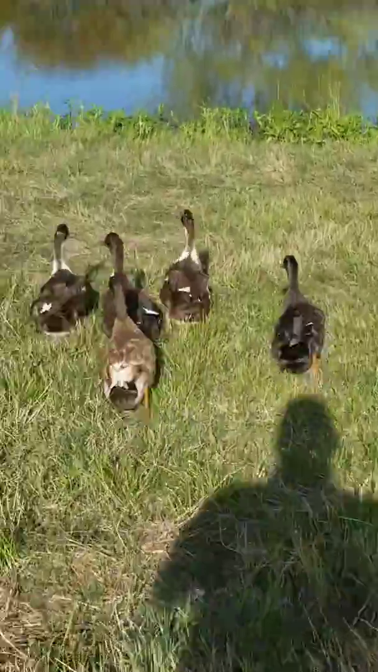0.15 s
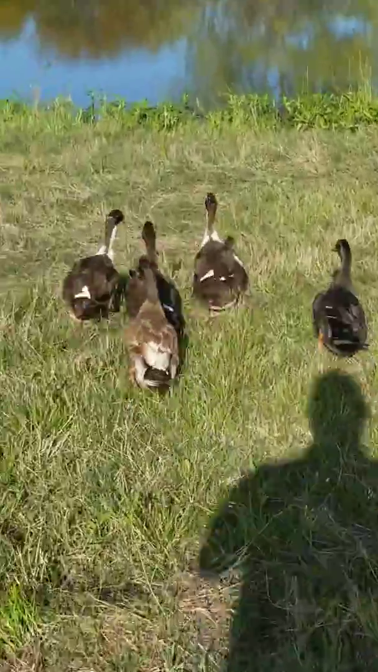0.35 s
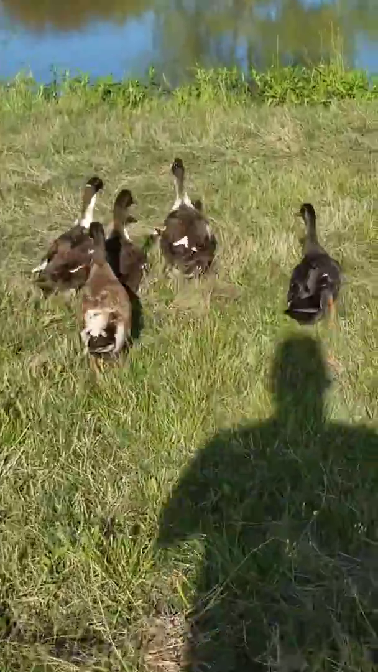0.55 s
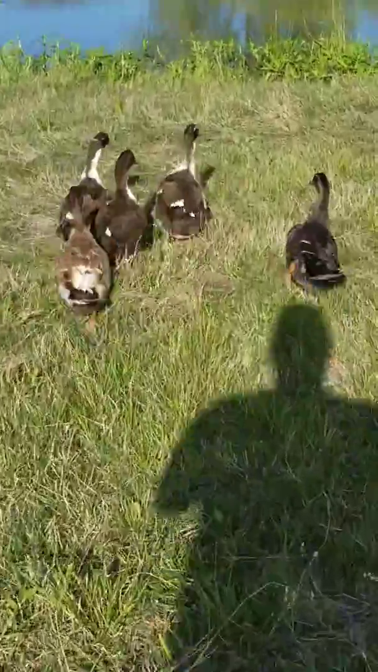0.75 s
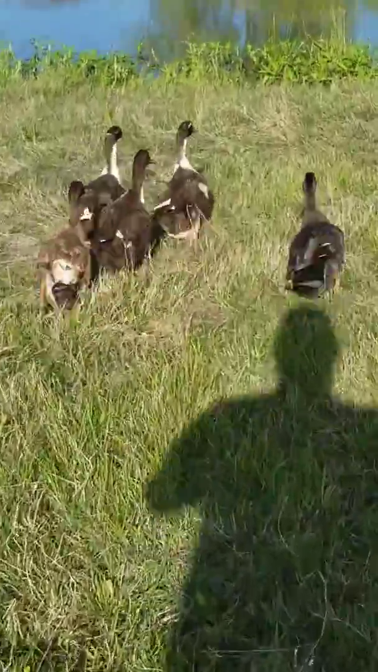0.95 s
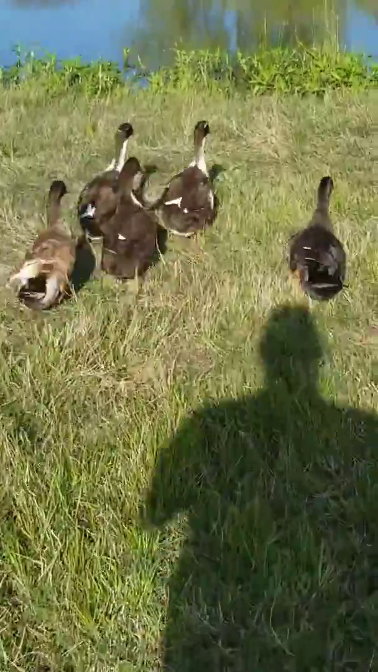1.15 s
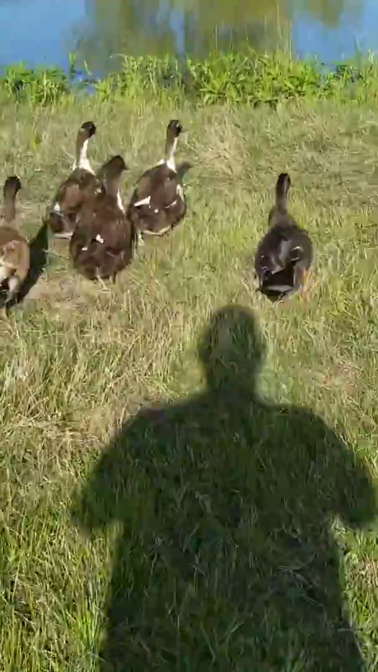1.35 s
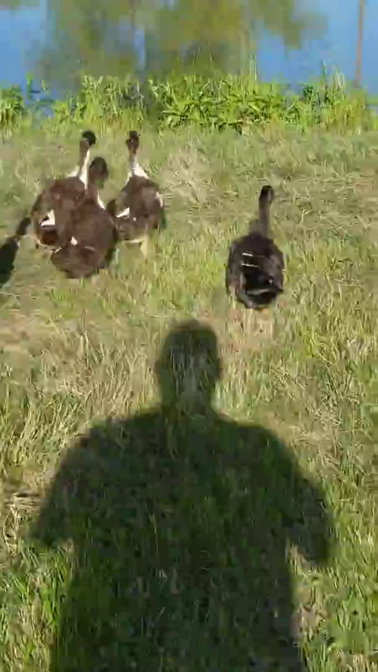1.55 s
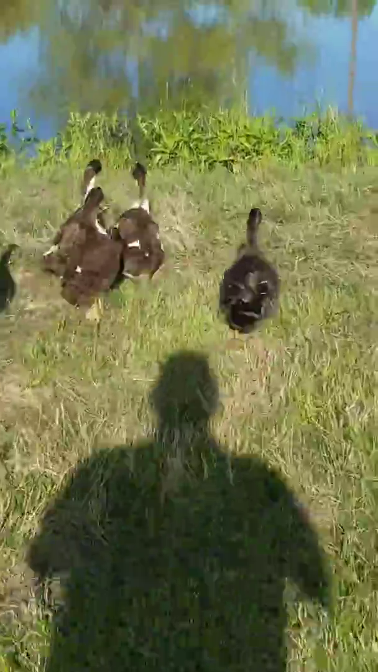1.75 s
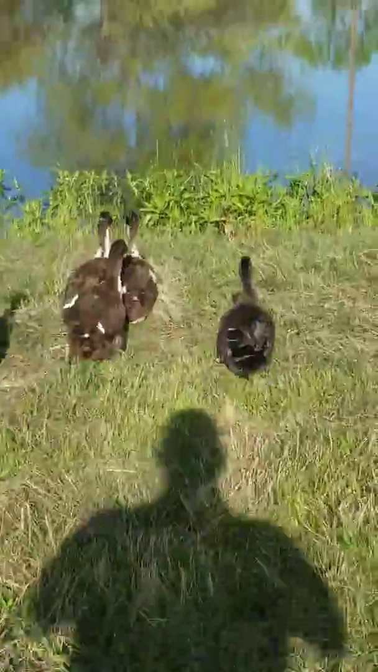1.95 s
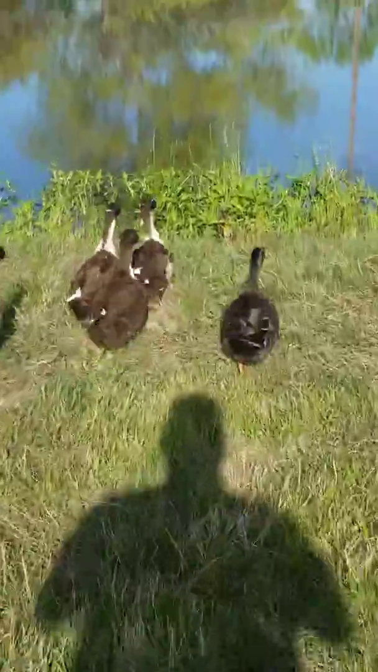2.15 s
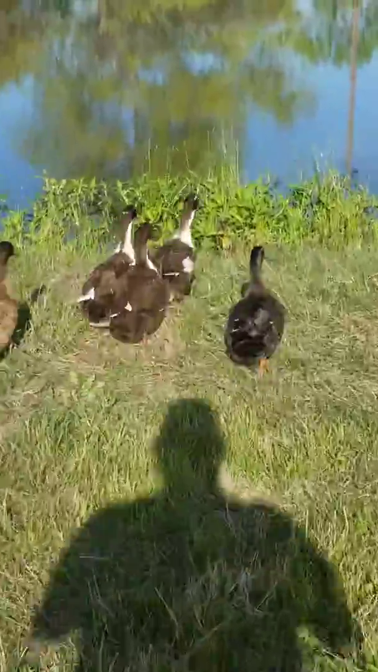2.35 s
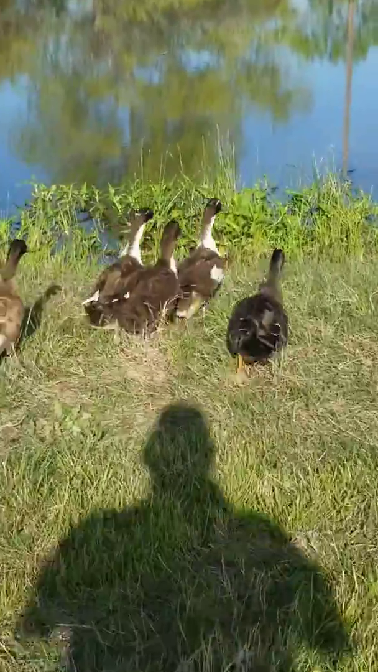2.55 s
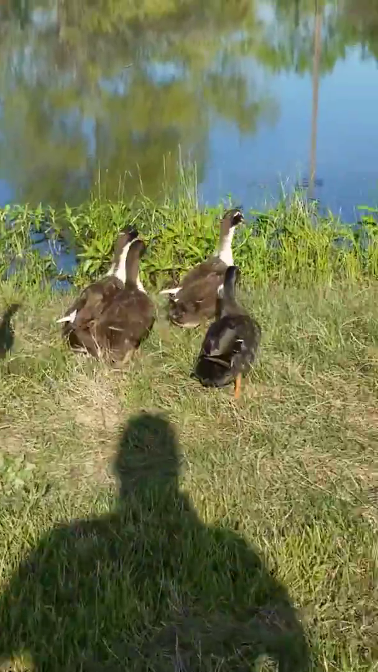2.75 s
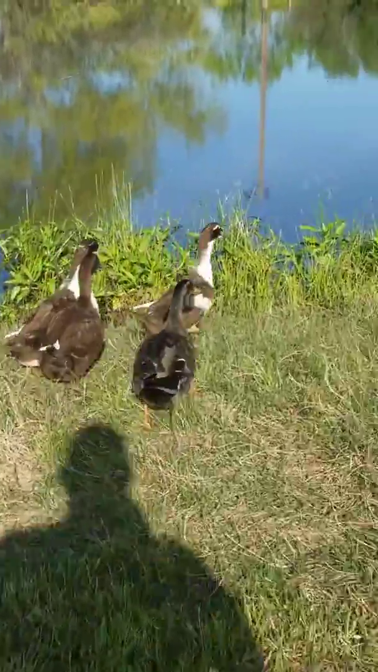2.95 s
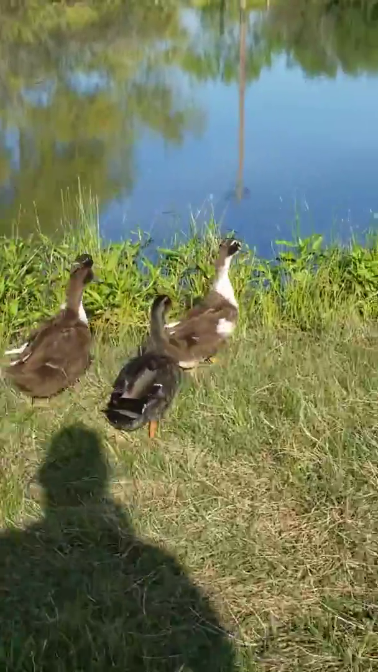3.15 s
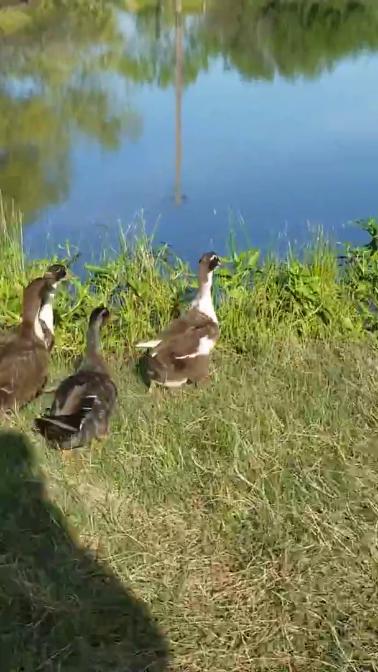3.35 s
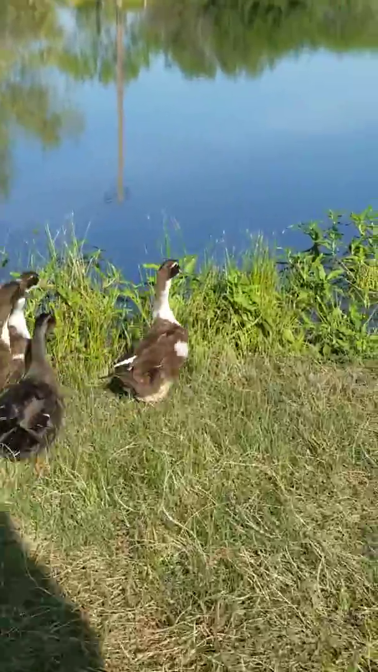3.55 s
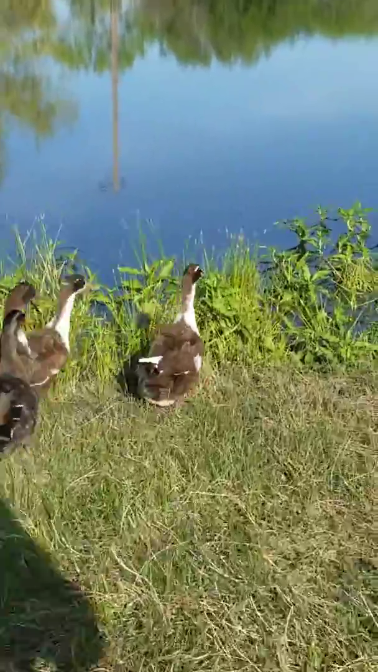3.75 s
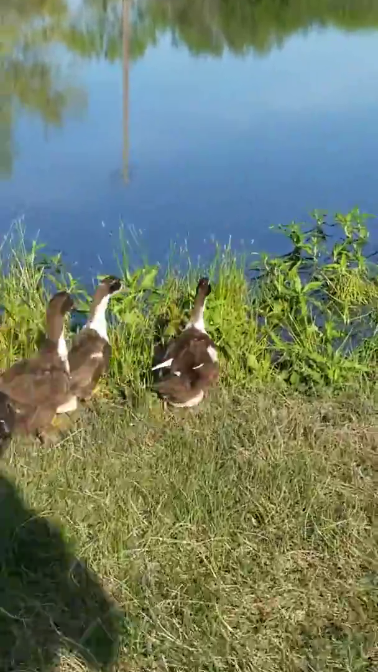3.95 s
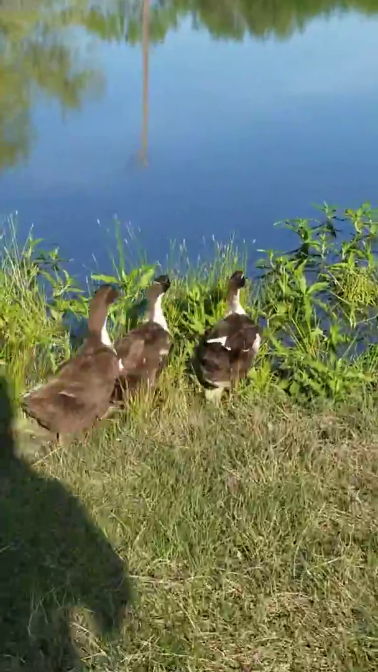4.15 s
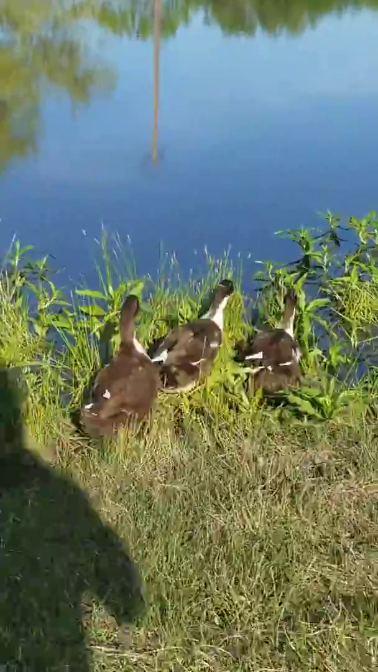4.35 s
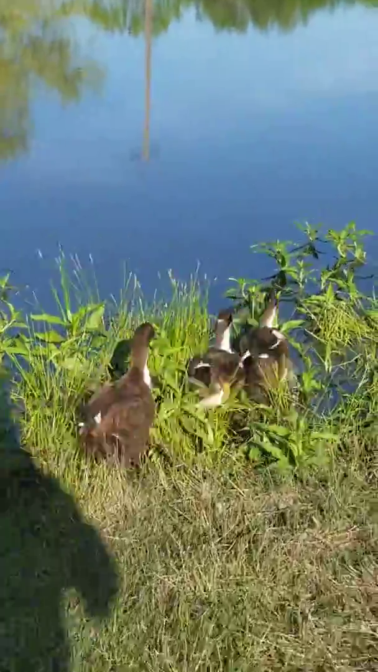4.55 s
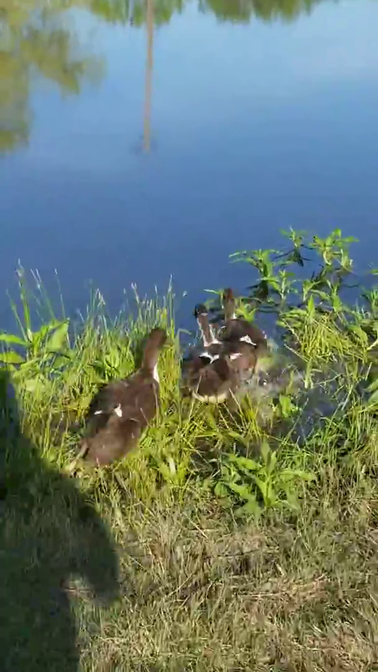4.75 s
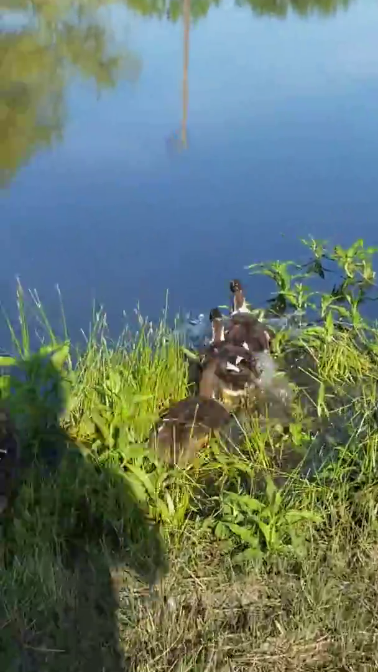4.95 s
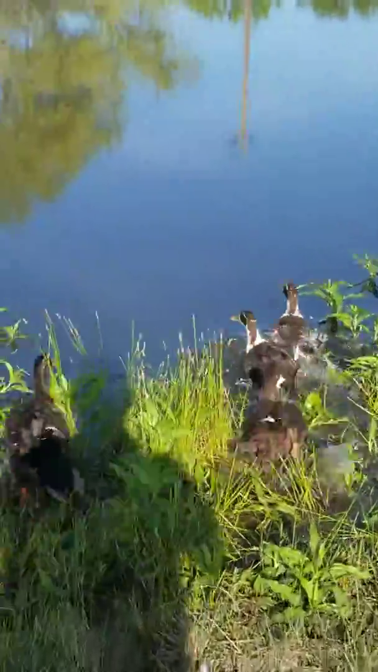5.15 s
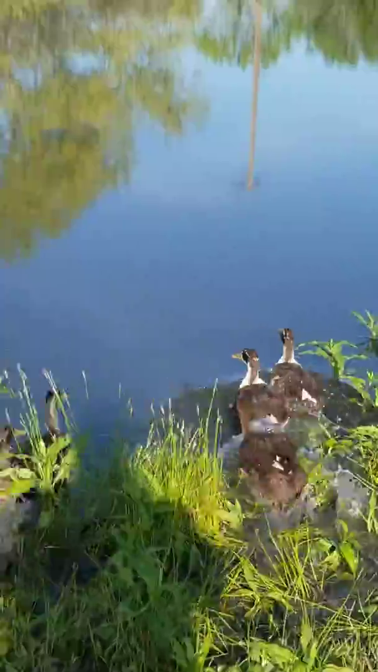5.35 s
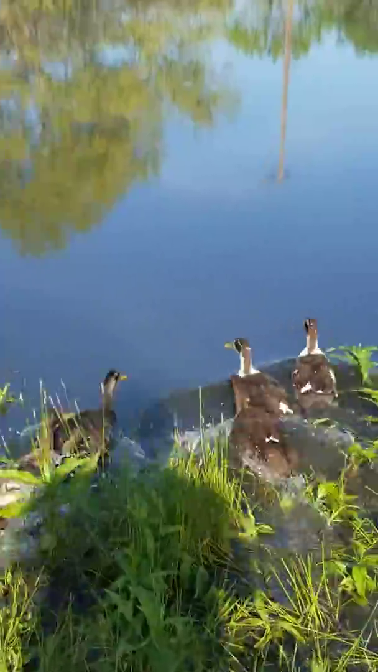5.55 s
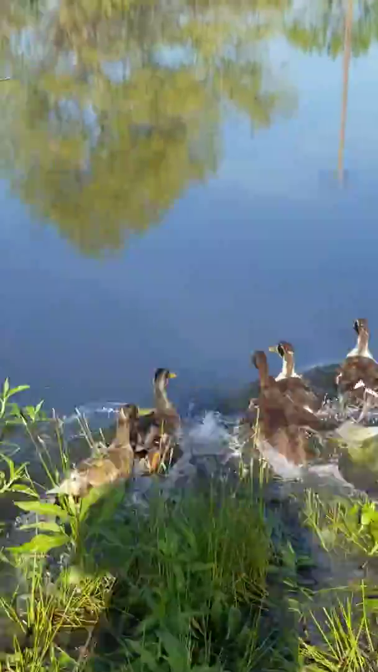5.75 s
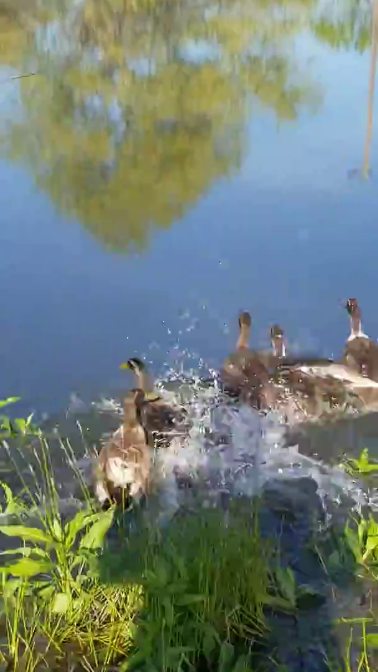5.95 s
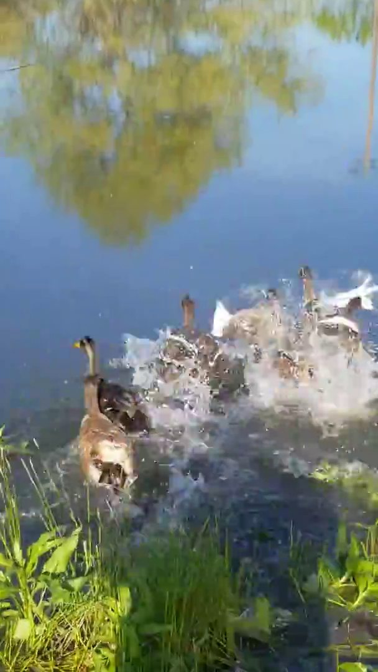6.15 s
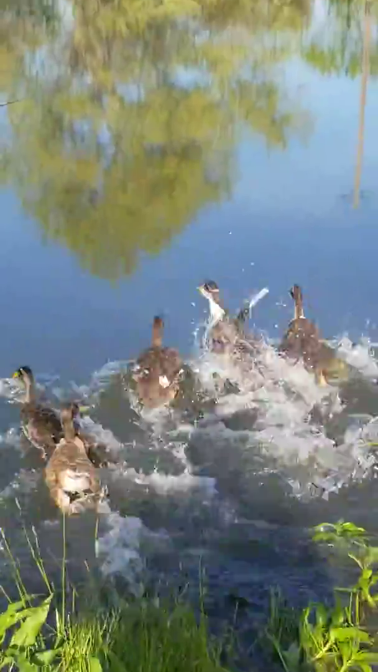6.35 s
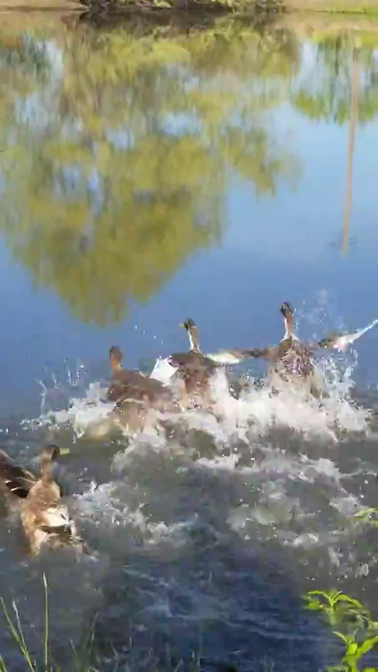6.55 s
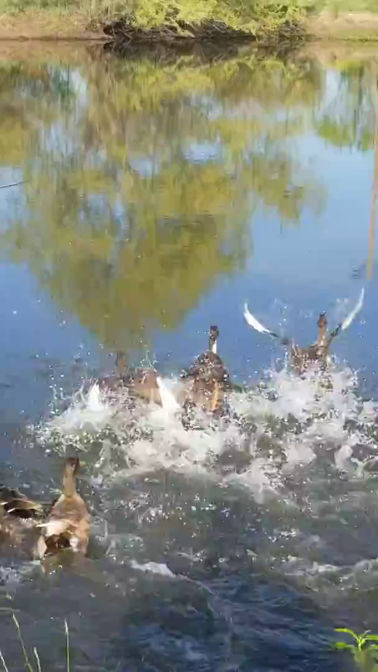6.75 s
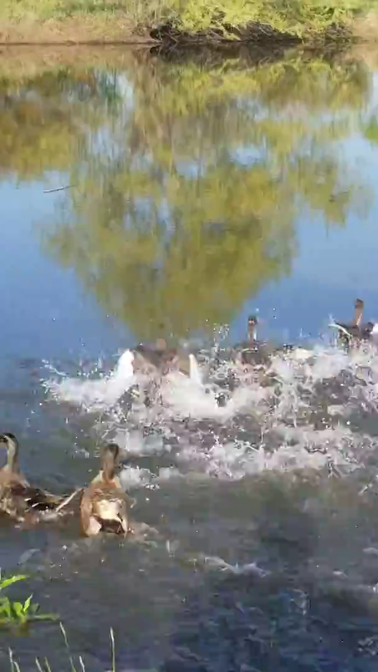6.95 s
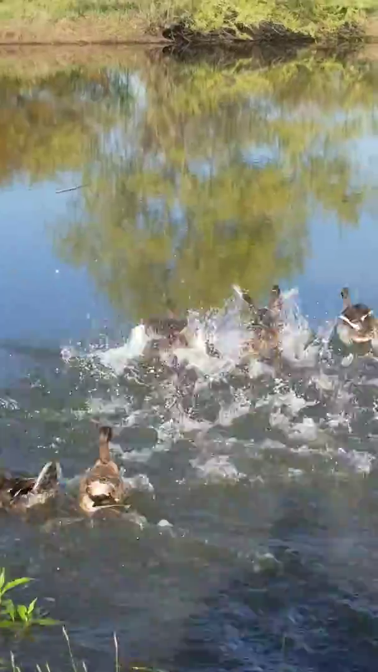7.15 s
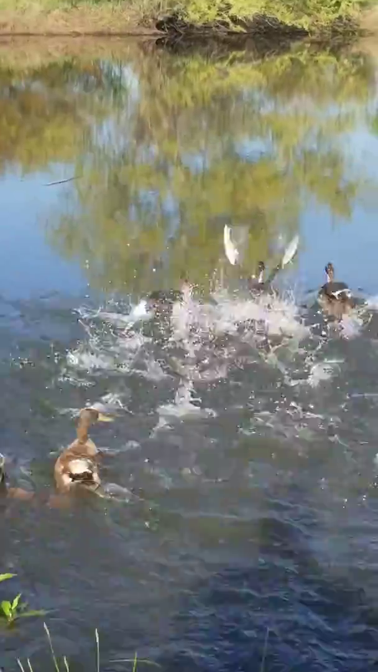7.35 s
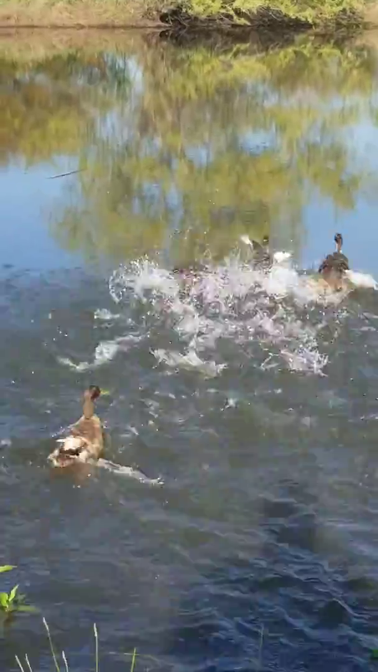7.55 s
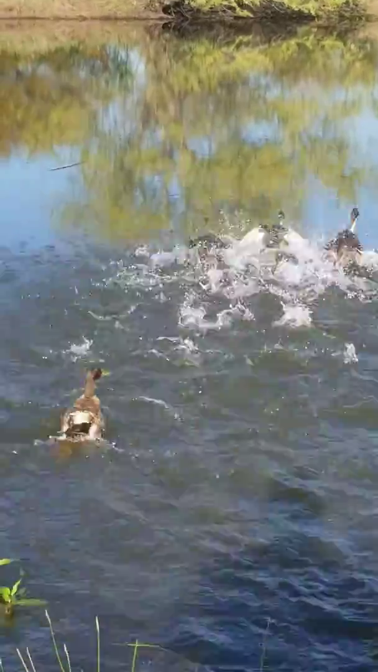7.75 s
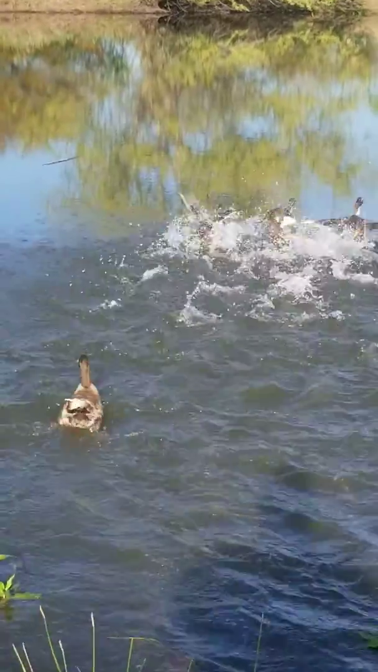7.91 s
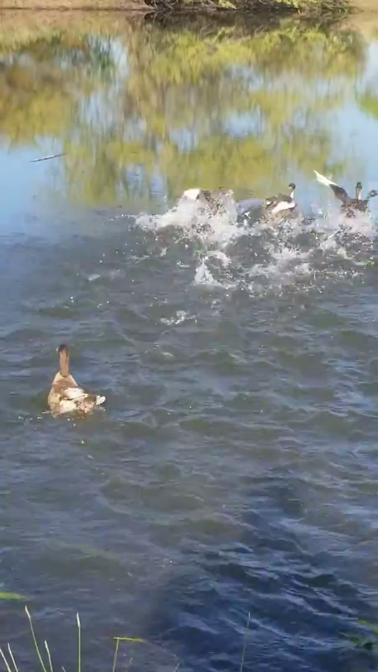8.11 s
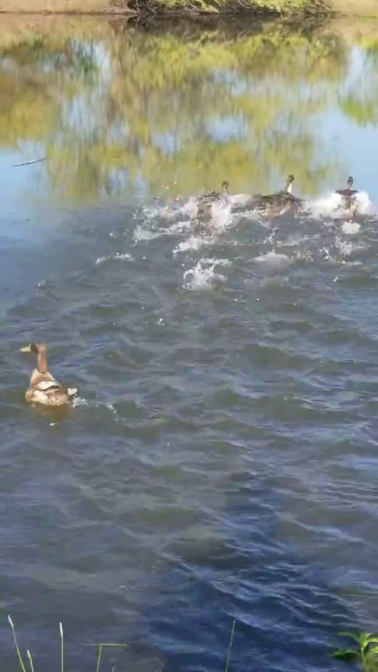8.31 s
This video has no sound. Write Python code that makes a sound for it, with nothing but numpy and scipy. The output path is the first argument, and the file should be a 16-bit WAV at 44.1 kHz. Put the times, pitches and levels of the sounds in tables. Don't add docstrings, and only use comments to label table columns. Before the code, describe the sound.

Outdoors in the open, a walker's boots crunch dry grass close below the microphone while ducks scuffle ahead, stalks ticking and snapping, with sparse quiet rasping quacks. At the bank the birds cluck quickly and weeds crack. They plunge into the pond; slaps, plops and spray build to a loud flurry, then recede as they swim away. A handheld phone catches faint low breeze buffeting.

```python
import sys
import numpy as np
from scipy import signal
from scipy.fft import rfft, irfft, next_fast_len
from scipy.io import wavfile
from scipy.ndimage import map_coordinates

SR = 44100
rng = np.random.default_rng(int(sys.argv[2]) if len(sys.argv) > 2 else 0)


def volts_from_decibels(level):
    exponent = np.asarray(level, float) / 20
    return 10 ** exponent


def generate_wav(signal):
    frames = np.transpose(np.atleast_2d(signal))
    scaled = np.clip(frames, -1, 1) * 32767
    pcm = np.round(scaled).astype(np.int16)
    wavfile.write(sys.argv[1], SR, pcm)


N = 369548

# f/Hz, level/dB, left minus right/dB
BELOW_COLOUR = [(125, -36, 47), (283, -7.5, -14), (425, 5.5, -3), (700, 1.5, 3), (1074, 2, -11),
                (1400, 7, 7.5), (1600, 11, -6), (1900, 1, 0.5), (2900, -4, 0), (5160, -10, 0),
                (5560, -15, -5.5), (9070, -16, -3), (12800, -5, -2), (16600, -9.5, -5.5)]
# f/Hz, level/dB, left minus right/dB
AHEAD_COLOUR = [(78.4, -14.5, 6), (209, -13, 0.5), (350, -12, 3.5), (560, 1.5, 3), (794, -4, 2),
                (1400, -3, -0.5), (1850, -0.5, -6), (2930, -4.5, -1), (2985, -8, 9), (4180, -5, -5.5),
                (5060, -9, -3), (7770, -17.5, 7.5), (9200, -29, -4), (11700, -23, 2)]
# f/Hz, phase/rad
BELOW_LEAD = [(0, 0.5), (800, -2.5), (1600, -5.0), (2900, -9), (16000, -53.5)]
# f/Hz, phase/rad
AHEAD_LEAD = [(0, 0), (600, -.25), (1450, -.6), (1800, .15), (2300, 1.8), (3000, 2.9), (3500, 3.3),
              (4000, 4.9), (5600, 7.2), (16000, 19.4)]
# f/Hz, boots/1, pond/1
LIKENESS = [(300, .5, .95), (700, .87, .96), (1600, .83, .86), (3000, .93, .72), (5500, .8, .65),
            (10000, .5, .4)]

# t/s, hold/s, level/dB
TREADS = [(0.0, 0.025, -40.5), (.32, 0.062, -36.5), (.47, 0.036, -40.5), (.84, 0.19, -43.5),
          (1.1, 0.12, -52.5), (1.35, 0.079, -44.5), (1.6, .15, -73), (1.87, 0.047, -46),
          (2.12, 0.16, -43.5), (2.38, 0.072, -44), (2.52, 0.092, -50), (2.8, 0.05, -38),
          (2.9, 0.066, -39.5), (3.25, 0.1, -45.5), (3.39, 0.038, -46), (3.65, 0.13, -47),
          (3.76, 0.091, -46), (3.9, 0.051, -48.5), (4.03, 0.017, -43), (4.19, 0.11, -45), (4.37, .03, -56),
          (4.47, 0.0084, -46)]
# t/s, hold/s, level/dB
SWEEPS = [(0.0, 0.077, -54.5), (.29, 0.063, -45.5), (.44, 0.074, -50.5), (.75, 0.16, -53),
          (1.24, 0.015, -54), (1.35, 0.094, -52.5), (1.6, 0.17, -55.5), (1.87, 0.093, -58.5),
          (2.2, 0.24, -54), (2.78, 0.053, -54), (2.93, 0.1, -60), (3.22, 0.092, -50.5),
          (3.37, 0.033, -54.5), (3.62, 0.24, -53), (4.1, 0.14, -51), (4.37, 0.046, -56.5),
          (4.64, 0.078, -48.5), (4.81, 0.023, -45.5), (5.09, 0.13, -48)]
# t/s, hold/s, level/dB
SCUFFLES = [(0.0, 0.014, -49), (.31, 0.041, -56), (.47, 0.031, -62), (.57, 0.11, -48), (.74, 0.088, -49.5),
            (.86, 0.093, -43.5), (1.1, 0.17, -49), (1.25, 0.2, -46.5), (1.48, 0.023, -48),
            (1.6, 0.15, -43.5), (1.87, 0.057, -43.5), (2.09, 0.3, -43.5), (2.45, 0.032, -46.5),
            (2.71, 0.027, -45.5), (2.8, 0.028, -44.5), (2.93, 0.061, -45.5), (3.07, 0.23, -48.5),
            (3.38, 0.05, -48), (3.62, 0.17, -45.5), (3.88, 0.084, -46.5), (4.03, 0.035, -51),
            (4.12, .1, -59), (4.26, .03, -60), (4.35, 0.17, -44)]
# t/s, hold/s, level/dB
GUSTS = [(0.0, 0.032, -52), (.31, 0.041, -53), (.72, 0.059, -62), (.88, 0.14, -68), (1.25, 0.033, -72),
         (1.47, 0.041, -60), (2.07, 0.084, -64), (2.5, 0.1, -60.5), (2.7, 0.031, -55), (2.82, 0.25, -54.5),
         (3.22, 0.1, -61.5), (3.65, 0.31, -66.5), (4.03, 0.038, -59), (4.22, 0.051, -56),
         (4.48, 0.055, -68)]
# t/s, peak level/dB, ring f/Hz
KNOCKS = [(0.026, -41, 323), (0.29, -49, 503), (0.319, -38, 444), (0.431, -37, 404), (0.453, -26, 580),
          (0.483, -34, 436), (0.74, -35, 550), (0.873, -22.5, 510), (0.926, -23, 1040), (0.966, -35, 543),
          (1.08, -34.5, 424), (1.335, -45, 374), (1.363, -27, 570), (1.636, -43, 860), (1.921, -30, 1100),
          (2.095, -31, 458), (2.161, -31, 524), (2.183, -33, 425), (2.218, -30, 431), (2.377, -28, 487),
          (2.423, -23.5, 432), (2.801, -43, 530), (2.818, -25, 456), (2.892, -26, 600), (2.951, -33.5, 343),
          (3.306, -38, 450), (3.324, -27, 543), (3.4, -40, 430), (3.772, -43, 1290), (3.772, -28.5, 410),
          (3.835, -20.5, 1030), (3.914, -38, 1010), (4.023, -39, 1300), (4.023, -41, 1150),
          (4.11, -40, 1130), (4.188, -22.5, 583), (4.226, -29, 433), (4.472, -28.5, 402), (4.519, -36, 527),
          (4.574, -43, 526)]
# t/s, peak level/dB, ring f/Hz
FLICKS = [(0.285, -34, 1720), (0.3224, -33, 1430), (0.4529, -37, 1580), (0.5033, -37, 2090),
          (0.7814, -30, 2050), (0.863, -28, 1500), (0.912, -39, 2190), (0.9274, -25, 1710),
          (1.1797, -41, 1600), (1.2466, -27, 2170), (1.2865, -38, 1750), (1.3404, -26, 1650),
          (1.466, -30, 2260), (1.478, -28, 2120), (1.498, -28, 1630), (1.583, -21, 1570),
          (1.5985, -23, 2180), (1.6297, -38, 1690), (1.6841, -38, 1570), (1.697, -19.5, 1610),
          (2.071, -29, 1440), (2.0941, -30, 1630), (2.1046, -27, 1490), (2.117, -33, 1600),
          (2.1884, -38, 1570), (2.2189, -37, 1440), (2.2393, -38, 1550), (2.2573, -33, 1560),
          (2.2747, -24, 1510), (2.319, -24, 1650), (2.6673, -32, 1610), (2.6928, -32, 1480),
          (2.7965, -42, 2100), (2.8928, -32, 1430), (2.9103, -35.5, 2180), (2.92, -22, 1440),
          (2.9512, -29, 1567), (3.1944, -24, 1620), (3.3822, -28, 1560), (3.6067, -43, 1610),
          (3.6326, -38, 1540), (3.836, -24, 1470), (3.8641, -41, 1360), (3.8736, -32, 1330),
          (3.889, -22, 1400), (4.0253, -36, 1520), (4.1111, -27, 1400), (4.1969, -23, 2090),
          (4.284, -28, 1730), (4.4738, -17.5, 2000), (4.6114, -24.5, 1930)]
# t/s, peak level/dB
BOOT_SNAPS = [(0.029, -33), (0.452, -24.5), (0.862, -46), (0.881, -40), (0.893, -45), (0.943, -38),
              (0.968, -37), (1.368, -28.5), (1.63, -31), (2.188, -47), (2.952, -42), (3.575, -72)]
# t/s, peak level/dB, ring f/Hz
WEED_SNAPS = [(0.928, -14, 1930), (1.397, -27, 1490), (2.219, -23, 1440), (3.836, -29, 1440),
              (4.025, -43, 1540), (4.111, -31, 1370), (4.19, -27, 2100), (4.336, -35, 2400),
              (4.385, -30, 1620), (4.347, -33, 2400), (4.472, -21, 2130), (4.831, -20, 1320),
              (4.893, -33, 2350), (4.911, -19, 1370), (4.947, -21.5, 2300), (5.016, -36, 1600),
              (5.068, -12, 1630), (5.199, -40, 1680), (5.258, -24, 1660), (5.316, -33, 1730),
              (5.716, -21, 2110), (7.412, -19, 1190)]
# t/s, length/s, pulse rate/Hz, level/dB, bill f/Hz
RASPS = [
    (0.689, 0.037, 74, -50, 1900),
    (1.247, 0.069, 88, -40.5, 2070),
    (1.458, 0.068, 86, -43.5, 1900),
    (1.584, 0.027, 120, -41, 2300),
    (2.078, 0.044, 67, -45, 1610),
    (2.312, 0.09, 82, -42.5, 2150),
    (2.69, 0.052, 110, -45, 1600),
    (3.876, 0.052, 86, -42.5, 2140),
]
# t/s, length/s, pulse rate/Hz, level/dB, bill f/Hz
CLUCKS = [(4.016, 0.034, 147, -37, 1215), (4.187, 0.024, 156, -40.5, 1900), (4.47, 0.023, 206, -46, 1900),
          (4.62, 0.021, 300, -41, 1900), (4.646, 0.023, 267, -32, 1215), (4.68, 0.0067, 410, -41, 1800),
          (4.706, 0.024, 1610, -63, 1620), (4.762, 0.031, 1230, -50.5, 1280),
          (4.821, 0.0041, 400, -31.5, 2120), (4.8405, 0.018, 232, -27, 1310), (4.903, 0.02, 215, -35, 1400),
          (5.07, 0.031, 320, -36.5, 1690), (5.138, 0.0113, 170, -34, 1400), (5.9775, 0.023, 155, -32, 1650),
          (6.69, 0.04, 176, -32, 1470), (6.7275, 0.038, 200, -31, 1650), (6.764, 0.027, 212, -35, 1380),
          (6.798, 0.02, 184, -28.5, 1550)]
# t/s, level/dB
VIGOUR = [(4.1, -76), (4.5, -49), (4.72, -45), (5.0, -44), (5.3, -42), (5.45, -44), (5.8, -41),
          (6.03, -38.5), (6.45, -37.5), (6.7, -35), (6.9, -37), (7.3, -40), (8.0, -42), (8.38, -44.5)]
# t/s, peak level/dB, centre f/Hz
WHIPS = [(4.1879, -31, 11800), (4.337, -28.5, 5260), (4.3854, -31, 7430), (4.4108, -29, 4120),
         (4.4726, -38, 4690), (4.58, -31, 13600), (4.6, -33, 5260), (4.657, -26.5, 4200),
         (4.798, -32, 14400), (4.836, -28, 14200), (4.833, -22.5, 13000), (4.99, -30.5, 4270),
         (5.0527, -44, 4110), (5.0659, -39, 4100), (5.1442, -30, 13700)]
# t/s, peak level/dB, bubble f/Hz
DROPS = [(5.199, -29, 1700), (5.257, -23, 1650), (5.294, -17, 1680), (5.328, -15, 1750), (5.419, -26, 410),
         (5.515, -28, 1510), (5.645, -33, 570), (5.749, -19, 584), (5.846, -27, 744), (5.936, -17, 1700),
         (5.943, -15, 1700), (6.114, -28, 1600), (6.133, -19, 2150), (6.269, -24, 553), (6.442, -18, 1910),
         (6.549, -20, 560), (6.657, -32, 537), (6.69, -12, 1370), (6.97, -29, 483), (7.061, -23, 610),
         (7.157, -38, 674), (7.274, -21, 535), (7.317, -23, 520), (7.361, -26, 640), (7.461, -23, 540),
         (7.599, -25, 1630), (7.747, -24, 694), (7.784, -36, 696), (7.801, -18.5, 1960), (7.918, -19, 1600),
         (8.163, -23, 900), (8.309, -27, 1130)]
# t/s, peak level/dB
DUNKS = [(5.383, -41), (5.738, -37), (5.944, -42.5), (5.996, -36.5), (6.04, -48), (6.178, -38),
         (6.21, -39.5), (6.38, -53), (6.475, -36), (6.628, -31.5), (6.71, -31.5), (6.759, -39),
         (6.807, -35), (6.968, -58.5), (7.285, -37), (7.419, -34), (7.498, -36), (7.536, -55), (7.684, -43),
         (7.731, -36.5), (7.87, -54), (8.179, -45)]
# t/s, level against the blow/dB
POCKETS = [(5.8, -32.5), (6.5, -19.5)]
# t/s, peak level/dB, cavity f/Hz, spray level/dB
SLAPS = [(5.653, -22.5, 600, -55), (5.733, -8, 525, -23.5), (5.839, -28, 450, -47),
         (5.878, -22.5, 620, -53), (5.932, -17, 455, -46), (5.999, -38, 996, -22), (6.2, -20.5, 458, -26),
         (6.331, -14, 560, -50), (6.594, -20, 633, -32), (6.607, -11, 1400, -12), (6.676, -23.5, 600, -19),
         (6.821, -14.5, 540, -20), (6.835, -11.5, 480, -12.5), (6.874, -15, 453, -20),
         (7.077, -17.5, 595, -18), (7.237, -13.5, 533, -47), (7.294, -15, 515, -18),
         (7.431, -12.5, 506, -32), (7.631, -22, 540, -52), (7.665, -18.5, 716, -56), (7.735, -22, 500, -20),
         (7.74, -15.5, 437, -23), (7.961, -14, 490, -14.5), (8.009, -32, 727, -24), (8.238, -23, 537, -29),
         (8.35, -27.5, 700, -31)]

PARTS_HZ = (900, 2800, 8500)
# rise/(dB/s), fall/(dB/s)
TREAD_SLOPES, SWEEP_SLOPES = (620, 410), (230, 260)
SCUFFLE_SLOPES, GUST_SLOPES = (330, 530), (350, 240)
TREAD_PARTS, SWEEP_PARTS = (-6.5, -9, -16, -45), (-3.5, 1, -1.5, 0.6)
SCUFFLE_PARTS = (-19.5, -3, -15.5, -77)
STILL_PARTS = (-59.5, -63, -63.5, -58.5)
WEED_PARTS, WATER_PARTS = (-4, 0, -9, -7.5), (-5, -0.5, -6.5, -6)
AFLOAT_S = (5.55, 6.2)
LEAVE_S, FADE_DB_PER_S = 5.26, (0.083, 0.1, 0.8, 2.8)
POCKET_EARLY_S, POCKET_HZ, SINK_DB = 0.002, (90, 278), 13.5
THROAT_CUT_HZ, STALK_CUT_HZ = 1010, 540
STALK_HZ = (1410, 1750)
SHALLOW_HZ = 243
WHIP_S = 0.0043
AIR_DB, CALM_DB = -66, -79
SWAY_SAMPLES, SWAY_PER_S = .7, 1.5
CUTOFF_HZ = 15950
SIZE = next_fast_len(N + 4096)
HZ = np.arange(SIZE // 2 + 1) * SR / SIZE


def rms_one(x):
    return x / np.sqrt(np.mean(np.mean(np.atleast_2d(x), axis=0) ** 2) + 1e-20)


def in_time(rows):
    s, *columns = np.transpose(rows)
    return [np.interp(np.arange(N) / SR, s, c) for c in columns]


def on_log(rows, column):
    return np.interp(np.log(HZ + 1), np.log(np.array(rows)[:, 0]), np.array(rows)[:, column])


def drift(rate):
    r = np.exp(-40 * np.pi * rate / SR)
    chance = rng.standard_normal(N // 20 + 2002)
    slow = signal.lfilter([1], [1, -2 * r, r * r], chance)[2000:]
    return np.interp(np.arange(N) / 20, np.arange(len(slow)), rms_one(slow))


def ring(clicks, hz, t60):
    r, w = volts_from_decibels(-60 / (t60 * SR)), 2 * np.pi * hz / SR
    return signal.lfilter([0, np.sin(w)], [1, -2 * r * np.cos(w), r * r], clicks + 1e-18)


def add(out, s, piece):
    at = max(round(s * SR), 0)
    out[..., at:at + piece.shape[-1]] += piece[..., :N - at]


def ports(colour, lead):
    cepstrum = irfft(on_log(colour, column=1) * np.log(10) / 20, SIZE)
    cepstrum[1:SIZE // 2] *= 2
    cepstrum[SIZE // 2 + 1:] = 0
    phase = np.interp(HZ, *np.transpose(lead))
    half = volts_from_decibels(on_log(colour, column=2) / 2) * np.exp(.5j * phase)
    return np.exp(rfft(cepstrum)) * np.array([half, 1 / half])


def heard(x, way):
    return irfft(rfft(x, SIZE) * way, SIZE)[:, :N]


def grains(per_s, spread_db, clump_db):
    sizes = volts_from_decibels(spread_db * np.minimum(rng.exponential(1, (3, N)), 4)) * rng.standard_normal((3, N))
    born = rng.random((3, N)) < per_s * volts_from_decibels(clump_db * drift(25)) / SR
    clicks = sizes * born
    return rms_one(clicks[0]), clicks[1:] / np.std(clicks[1:])


def spread_out(common, own, column, way, levels_db, together_db, patchy_db):
    alike = np.clip(on_log(LIKENESS, column), 0, 1)
    both = way * (np.sqrt(alike) * rfft(common, SIZE) + np.sqrt(1 - alike) * rfft(own, SIZE))
    under = [0 * HZ] + [1 / (1 + (HZ / hz) ** 12) for hz in PARTS_HZ] + [0 * HZ + 1]
    gust = together_db * drift(15.0)
    parts = [rms_one(irfft(both * (b - a), SIZE)[:, :N]) for a, b in zip(under, under[1:])]
    return sum(p * volts_from_decibels(db + gust + patchy_db * drift(19.0)) for p, db in zip(parts, levels_db))


def moves(rows, slopes):
    t = np.arange(0, N + 64, 64)[:, None] / SR
    s, hold, db = np.transpose(rows)
    level = db - slopes[0] * np.maximum(s - t, 0) - slopes[1] * np.maximum(t - s - hold, 0)
    return np.interp(np.arange(N) / SR, t[:, 0], np.sum(volts_from_decibels(2 * level), axis=1))


def rustle():
    power = np.array([moves(TREADS, TREAD_SLOPES), moves(SWEEPS, SWEEP_SLOPES),
                      moves(SCUFFLES, SCUFFLE_SLOPES), np.ones(N)])
    shares = np.transpose([TREAD_PARTS, SWEEP_PARTS, SCUFFLE_PARTS, STILL_PARTS])
    return 10 * np.log10(volts_from_decibels(2 * shares) @ power)


def grass(way):
    common, own = grains(per_s=1600, spread_db=2.0, clump_db=3.0)
    hiss = volts_from_decibels(5.0) * signal.lfilter([1, -.6], [1], rng.standard_normal((3, N)))
    sizes = volts_from_decibels(4 * np.minimum(rng.exponential(1, N), 4))
    cracks = (rng.random(N) < 250 / SR) * sizes * np.sign(hiss[0])
    dealt = rng.integers(0, 10, N)
    pitches = np.geomspace(400, 4500, 10)
    husks = sum(ring(cracks * (dealt == k), hz, 7 / hz) for k, hz in enumerate(pitches))
    shared = common + volts_from_decibels(-17.5) * rms_one(husks) + hiss[0]
    return spread_out(shared, own + hiss[1:], 1, way, rustle(), together_db=0.37, patchy_db=2.0)


def breeze():
    low = signal.butter(2, [40, 90], "band", fs=SR, output="sos")
    rumble = signal.sosfilt(low, rng.standard_normal((2, N)))
    lumps = volts_from_decibels(np.array([1.0 * drift(23), 7.1 * drift(13) - 17]))
    return np.sqrt(moves(GUSTS, GUST_SLOPES) + volts_from_decibels(2 * CALM_DB)) * rms_one(rumble * lumps)


def blips(events, colour, cycles, climb, trim_db):
    out, t = np.zeros(N), np.arange(1600) / SR
    for (s, db, hz), (long, steep) in zip(events, rng.uniform(0.64, 0.74, (len(events), 2))):
        turns = hz * t
        shape = (1 - np.exp(-3 * turns)) * np.exp(-turns / (cycles * long))
        loss_db = np.interp(np.log(hz), np.log(np.array(colour)[:, 0]), np.array(colour)[:, 1])
        tone = np.sin(2 * np.pi * turns * (0.962 + climb * steep * turns))
        add(out, s, volts_from_decibels(db + trim_db - loss_db) * shape * tone)
    return out


def snaps(events):
    out = np.zeros(N)
    for (s, db, hz), (u, v) in zip(events, rng.random((len(events), 2))):
        tick = np.zeros(400)
        tick[30] = 1
        tick[int(60 + 60 * u)] = -.15 - .3 * v
        crack = .5 * ring(tick, hz, .005) + 4 * tick + 2.5 * np.diff(tick, prepend=0)
        add(out, s, volts_from_decibels(db + 3.0) * crack)
    return -signal.sosfilt(signal.butter(2, STALK_CUT_HZ, "high", fs=SR, output="sos"), out)


def ducks():
    out, calls = np.zeros(N), RASPS + CLUCKS
    for (s, length, per_s, db, hz), luck in zip(calls, rng.standard_normal((len(calls), 2, 40))):
        gaps = 1 + min(.045, 30 / per_s) * luck[0] - 1.2 / per_s * np.arange(40)
        beats = np.cumsum(gaps / per_s) - .5 / per_s
        keep = beats < length
        pulses = np.zeros(round((length + 0.033) * SR))
        swell = np.sin(np.pi * np.clip(beats / length, .15, .85)) ** .5 * volts_from_decibels(2.5 * luck[1])
        pulses[(beats[keep] * SR).astype(int)] = swell[keep]
        bill = ring(ring(pulses, hz, .0055), hz, .0055) * 1300 / SR
        voice = 1.88 * bill - 0.55 * ring(pulses, hz * 1.336, 0.0073)
        voice = voice + 0.12 * ring(pulses, 1343, 0.058)
        voice = voice + 0.65 * ring(pulses, 1.58 * hz, 0.0018)
        add(out, s, volts_from_decibels(db + 18.0) * voice)
    return signal.sosfilt(signal.butter(3, THROAT_CUT_HZ, "high", fs=SR, output="sos"), out)


def churn():
    t, (vigour,) = np.arange(N) / SR, in_time(VIGOUR)
    return [vigour + np.interp(t, AFLOAT_S, [weed, water]) - fade * np.maximum(t - LEAVE_S, 0)
            for weed, water, fade in zip(WEED_PARTS, WATER_PARTS, FADE_DB_PER_S)]


def pond(way):
    common, own = grains(per_s=4700, spread_db=-3.5, clump_db=2.0)
    born = rng.random(N) < 800.0 * volts_from_decibels(2 * drift(12)) / SR
    born = born * volts_from_decibels(3.5 * np.minimum(rng.exponential(1, N), 3))
    dealt = rng.integers(0, 18, N)
    pitches = np.geomspace(300, 5000, 18)
    bubbles = sum(ring(born * (dealt == k), hz, 13 / hz) for k, hz in enumerate(pitches))
    wet = common + volts_from_decibels(-7.5) * rms_one(bubbles)
    shallow = way / (1 + (SHALLOW_HZ / (HZ + 1)) ** 2)
    return spread_out(wet, own, 2, shallow, churn(), together_db=0.6, patchy_db=1.5)


def whips():
    out, t = np.zeros((2, N)), np.arange(600) / SR
    for (s, db, hz), noise in zip(WHIPS, rng.standard_normal((len(WHIPS), 2, 600))):
        band = signal.butter(1, [.75 * hz, min(1.4 * hz, 17000)], "band", fs=SR, output="sos")
        swish = t / WHIP_S * np.exp(-(t / WHIP_S) ** 2)
        add(out, s, volts_from_decibels(db - 4.5) * rms_one(signal.sosfilt(band, noise)) * swish)
    return out


def plops():
    out, t = np.zeros(N), np.arange(2000) / SR
    blows = [(s - POCKET_EARLY_S, db + np.interp(s, *np.transpose(POCKETS))) for s, db, *_ in SLAPS]
    pockets = DUNKS + blows
    for (s, db), (climb, small) in zip(pockets, rng.random((len(pockets), 2))):
        height = np.clip(.6 * small - (db + 30) / 25, 0, 1)
        hz = POCKET_HZ[0] + height * (POCKET_HZ[1] - POCKET_HZ[0])
        swell = t / .0035 * np.exp(1 - t / .0035)
        tone = np.sin(2 * np.pi * hz * t * (.85 + 12 * climb * t))
        add(out, s + .003, volts_from_decibels(db + SINK_DB) * swell * tone)
    return out


def wash():
    band = signal.butter(2, [55, 320], "band", fs=SR, output="sos")
    low = signal.sosfilt(band, rng.standard_normal(N))
    afloat = np.interp(np.arange(N) / SR, AFLOAT_S, [0, 1])
    return afloat * volts_from_decibels(churn()[0] + 2.0 + 5.8 * drift(21)) * rms_one(low)


def slaps():
    out, t = np.zeros((2, N)), np.arange(900) / SR
    for (s, db, hz, spray_db), noise in zip(SLAPS, rng.standard_normal((len(SLAPS), 3, 900))):
        dip = np.exp(-t / .00005) - np.exp(-t / 0.00024)
        dip = dip - dip.sum() / (.003 * SR) * np.exp(-t / .003)
        pocket = -np.sin(2 * np.pi * hz * t * (1 + 2.3 * t)) * np.exp(-t / 0.0036)
        swell = (1 - np.exp(-t / .0012)) / (1 + (t / .007) ** 6)
        burst = (.8 * noise[0] + .6 * noise[1:]) * swell
        fine = np.diff(burst, prepend=0)
        blow = 3.46 * dip + 0.31 * pocket + 0.33 * burst
        add(out, s + .0018, volts_from_decibels(db) * blow + volts_from_decibels(spray_db + 4.0) * fine)
    return out


def sway(x):
    when = np.arange(N) + SWAY_SAMPLES * drift(SWAY_PER_S)
    return np.array([map_coordinates(x[0], [when], order=3, mode="nearest"), x[1]])


def scene():
    below, ahead = ports(BELOW_COLOUR, BELOW_LEAD), ports(AHEAD_COLOUR, AHEAD_LEAD)
    air = volts_from_decibels(AIR_DB) * rms_one(heard(rng.standard_normal((2, N)), ahead))
    boot_snaps = snaps([(s, db, rng.uniform(*STALK_HZ)) for s, db in BOOT_SNAPS])
    knocks = blips(KNOCKS, BELOW_COLOUR, cycles=4.9, climb=0.0197, trim_db=-5.0)
    flicks = blips(FLICKS, BELOW_COLOUR, cycles=6.6, climb=0.0042, trim_db=-5.5)
    walk = grass(below) + heard(boot_snaps + knocks + flicks, below)
    drops = blips(DROPS, AHEAD_COLOUR, cycles=3.4, climb=0.008, trim_db=-5.0)
    splashes = slaps() + plops() + wash() + drops
    birds = pond(ahead) + heard(snaps(WEED_SNAPS) + ducks() + splashes, ahead)
    return sway(walk + birds) + whips() + breeze() + air


def band_limit(x):
    return signal.sosfilt(signal.butter(12, 16970, fs=SR, output="sos"), x)


def record(dry):
    steep = signal.cheby2(17, 60, CUTOFF_HZ * 1.01, fs=SR, output="sos")
    dull = signal.sosfilt(steep, dry)
    return band_limit(dull)


dry = scene()
out = record(dry)
generate_wav(out)
```